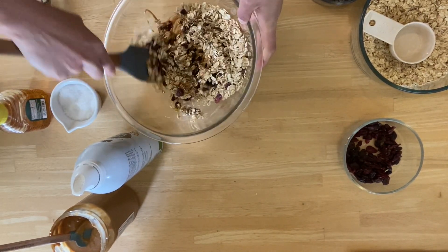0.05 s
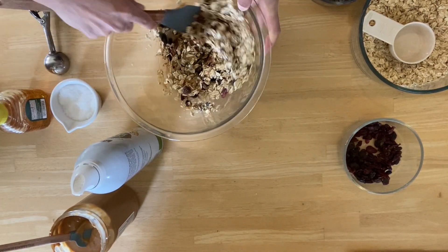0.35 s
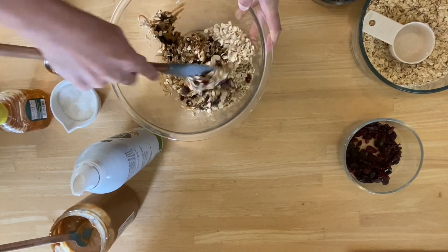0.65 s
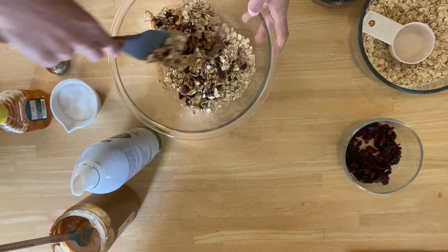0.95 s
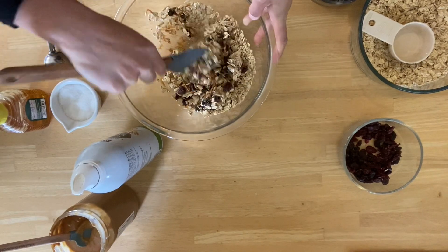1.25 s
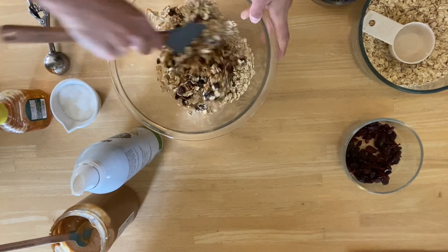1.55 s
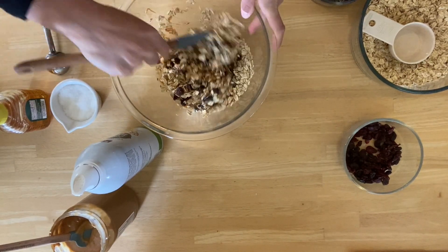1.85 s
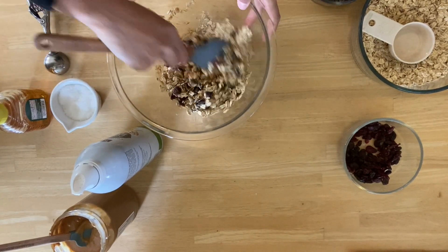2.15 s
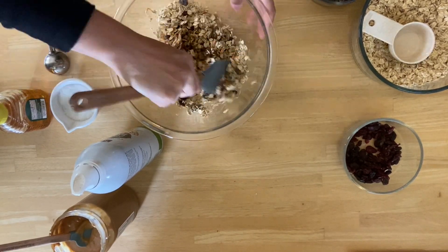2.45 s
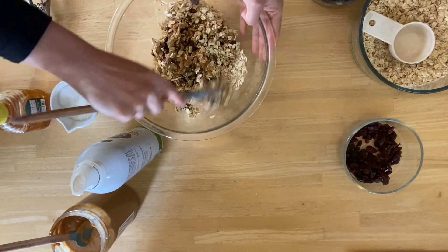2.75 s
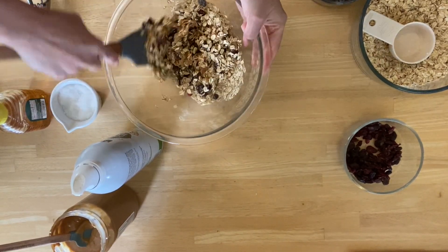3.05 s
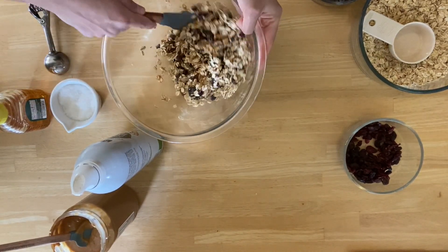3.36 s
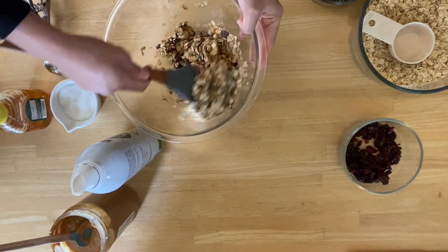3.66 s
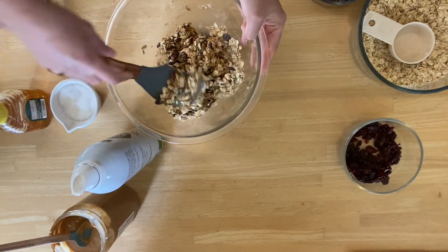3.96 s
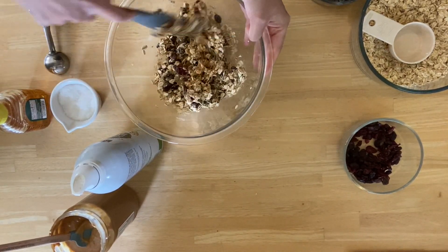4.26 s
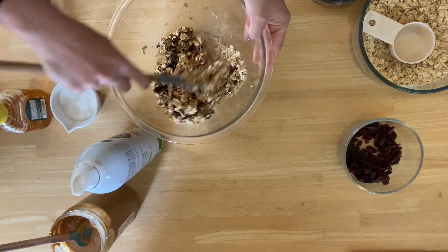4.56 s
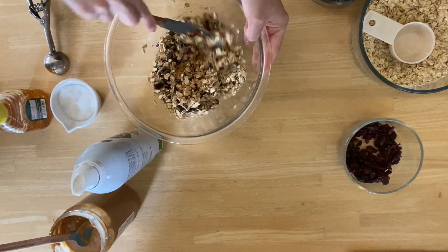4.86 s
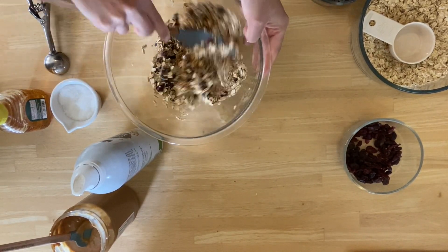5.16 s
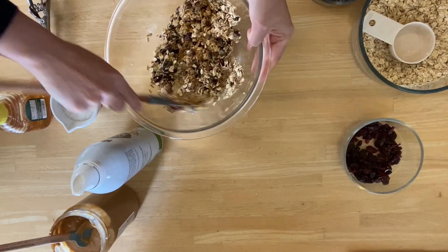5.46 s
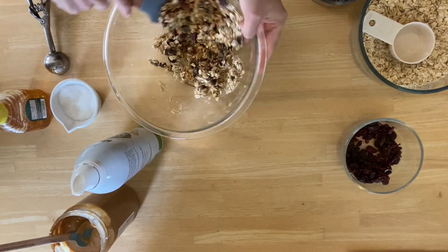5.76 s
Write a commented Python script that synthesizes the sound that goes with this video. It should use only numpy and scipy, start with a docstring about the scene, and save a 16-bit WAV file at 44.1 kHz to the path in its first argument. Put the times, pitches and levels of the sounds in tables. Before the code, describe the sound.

A silicone spatula folds a stiff oat mixture in a glass bowl, about three strokes a second, each a soft crackly rustle and scrape over a low rumble. Around one second in, the bowl rocks and knocks loudly on the wooden worktop, with lighter knocks later. Nuts snap here and there, one sharply near the middle, and the glass clinks faintly. The sound is close, in a small quiet kitchen, in wide stereo leaning right.

```python
"""Folding sticky oats in a glass bowl.

A silicone spatula pushes through a stiff oat mixture: each push rustles the flakes, rumbles the bowl
and may rub the glass. Now and then nuts snap, the glass clinks, and the bowl rocks and knocks on the
wooden worktop. A small kitchen answers. The stereo image is wide and leans to the right."""
import sys
import numpy as np
from scipy import signal
from scipy.fft import rfft, irfft, next_fast_len
from scipy.io import wavfile
from scipy.ndimage import uniform_filter1d, minimum_filter1d

SR = 44100
rng = np.random.default_rng(int(sys.argv[2]) if len(sys.argv) > 2 else 0)


def to_wav(s):
    """Save 16-bit WAV."""
    ch = np.atleast_2d(s).T  # columns
    pcm = np.round(np.clip(ch, -1, 1) * 32767)  # PCM
    wavfile.write(sys.argv[1], SR, pcm.astype(np.int16))


N = 265041


def amp(db):
    """Decibels to gain."""
    return 10 ** (np.asarray(db) / 20)


def unit(x):
    """Scales to rms 1."""
    return x / np.sqrt(np.mean(x ** 2) + 1e-20)


def curve_at(points, hz):
    """Reads a curve along a log-frequency axis."""
    f, value = np.transpose(points)
    return np.interp(np.log(hz + 1), np.log(f + 1), value)


def add(mix, start_s, sound):
    """Drops a sound into the mix."""
    part = mix[max(round(start_s * SR), 0):][:len(sound)]
    part += sound[:len(part)]


def colour(x, eq, size=8192):
    """Minimum-phase EQ through points of (frequency [Hz], gain [dB])."""
    log_gain = np.log(amp(curve_at(eq, abs(np.fft.fftfreq(size, 1 / SR)))))
    taps = np.fft.ifft(np.exp(np.conj(signal.hilbert(log_gain)))).real
    return signal.oaconvolve(x, taps[:size // 2])[:len(x)]


def resonate(x, hz, width_hz):
    """A resonance of gain 1 that follows the pitch curve hz."""
    turn = np.exp(2j * np.pi * np.cumsum(hz) / SR)
    pole = np.exp(-np.pi * width_hz / SR)
    return 2 * (turn * signal.lfilter([1 - pole], [1, -pole], x / turn)).real


def wander(rate_hz):
    """Smooth random modulation of rms 1."""
    lowpass = np.exp(-(np.fft.rfftfreq(N, 1 / SR) / rate_hz) ** 2)
    return unit(irfft(rfft(rng.standard_normal(N)) * lowpass, N))


def grains(per_s, spread_db):
    """Tiny slips at random moments, most small and a few large."""
    size = amp(spread_db * np.minimum(rng.exponential(1, N), 5))
    return unit(size * rng.choice([-1, 1], N) * (rng.random(N) < per_s / SR))


# The kitchen's reverb time: (frequency [Hz], t60 [s])
KITCHEN_DECAY = [(100, 0.18), (300, 0.54), (700, 0.4), (2000, 0.3), (6000, 0.13), (14000, 0.096)]
def room(x, gap_s=0.002):
    """The kitchen's diffuse tail, each band dying at its own speed."""
    taps = rng.choice([-1., 1.], SR) * (np.arange(SR) > gap_s * SR)
    hz, t, bands = signal.stft(taps, SR, nperseg=256)
    decay = amp(-60 * t / curve_at(KITCHEN_DECAY, hz)[:, None])
    tail = signal.istft(bands * decay, SR, nperseg=256)[1]
    return signal.oaconvolve(x, tail / np.linalg.norm(tail))[:len(x)]


# Spatula pushes, with a fader for each layer:
# (start [s], rise [s], release [s], fizz [dB], scrape [dB], shove [dB], grind [dB])
PUSHES = [(-0.01, 0.01, 0.74, -62, -61.5, -58.5, -74.5), (0.338, 0.19, 0.06, -65.5, -72.5, -68.5, -91),
          (0.519, 0.05, 0.98, -67.5, -70.5, -104, -104), (0.697, 0.15, 0.15, -58.5, -55.5, -52, -64.5),
          (1.034, 0.018, 0.32, -58.5, -56, -53, -55), (1.392, 0.014, 0.37, -60.5, -58, -52.5, -63),
          (1.704, 0.024, 0.31, -57, -57, -50.5, -62.5), (1.975, 0.036, 0.88, -64.5, -70, -62, -78.5),
          (2.065, 0.14, 0.071, -58.5, -57, -50.5, -59.5), (2.418, 0.14, 0.12, -60.5, -61, -53, -65.5),
          (2.759, 0.2, 0.43, -61.5, -63.5, -57.5, -72.5), (3.001, 0.094, 0.45, -63, -64, -66, -75),
          (3.451, 0.27, 0.26, -63.5, -66.5, -66.5, -77), (3.974, 0.11, 0.48, -64.5, -63, -63, -67.5),
          (4.351, 0.15, 0.12, -62, -63, -55.5, -77), (4.678, 0.15, 0.086, -61, -61, -56, -78),
          (5.022, 0.15, 0.089, -59.5, -58, -54.5, -68), (5.376, 0.019, 0.059, -68.5, -83, -52.5, -71),
          (5.456, 0.084, 0.27, -53.5, -54, -52, -71), (5.75, 0.029, 0.68, -64, -68, -75.5, -84.5)]
def effort(layer, bite_db=-9.5, bite_s=0.018, release_db=-21, lag_s=0, stretch=1):
    """One layer's envelope over all pushes: the blade bites, builds to full effort and lets go."""
    t, power = np.arange(N) / SR, np.zeros(N)
    fader = ["fizz", "scrape", "shove", "grind"].index(layer)
    for start, rise, release, *levels in PUSHES:
        age = t - start - lag_s
        rise_left = np.clip(1 - age / rise, 0, 1)
        letting_go = np.maximum(age - rise, 0) / (release * stretch)
        db = levels[fader] + bite_db * rise_left ** 2 + release_db * letting_go ** 0.94
        power += (np.clip(age / bite_s, 0, 1) * amp(db)) ** 2
    return np.sqrt(power)


# Modes of the hand-damped glass: (pitch [Hz], struck at the rim [dB], struck low down [dB], t60 [s])
GLASS_MODES = [(1405, -1, -22, .17), (2605, 0, -20, .25), (2860, -5, -20, .06), (4048, 1, -16, .27),
               (4510, -16, -2, .07), (5690, -4, -22, .16), (6880, -14, 0, .04), (7490, -5, -16, .14),
               (7850, -15, -1, .1), (8080, -7, -7, .14), (8850, -12, -2, .09), (9385, -7, -14, .13)]
def glass_ring(height, tilt_db=0):
    """The glass after one tap; the height of the tap decides which modes speak."""
    t = np.arange(SR // 3) / SR
    out = np.zeros(len(t))
    for hz, rim_db, wall_db, t60 in GLASS_MODES:
        db = height * rim_db + (1 - height) * wall_db + tilt_db * np.log2(hz / 4000)
        out += amp(db - 60 * t / t60) * np.sin(2 * np.pi * hz * t)
    return out


# Bright fizz of sliding flakes: (frequency [Hz], gain [dB])
FIZZ_EQ = [(1500, -25), (4000, -9), (6000, -4.5), (7800, 2), (9500, 0), (12000, -4), (14000, -11.5),
           (16000, -30.5)]
# Scrape along the glass: (frequency [Hz], gain [dB])
SCRAPE_EQ = [(200, 1.5), (450, -9), (900, -19), (1400, -9.5), (1900, -7), (2700, -1.5), (3500, -7.5),
             (4500, -3.5), (6000, -5), (9000, -29), (16000, -40.5)]
# Dull grind of the packed mixture: (frequency [Hz], gain [dB])
GRIND_EQ = [(100, -12.5), (330, 3.5), (480, 5.5), (700, -1.5), (950, -1.5), (1400, -1), (2200, -11),
            (6000, -43.5)]
def rustle(pocket_hz=2400, settle_fizz_db=-82.5, settle_scrape_db=-85.5):
    """Sticky flakes slide, crack and grind under the blade, and settle faintly between pushes."""
    slips = grains(per_s=9590, spread_db=1.6)
    crackle = amp(-12) * grains(per_s=99, spread_db=3.5)
    fizz = unit(colour(slips + crackle, FIZZ_EQ)) * (effort("fizz") + amp(settle_fizz_db))
    fizz *= amp(3.1 + 2.1 * wander(70))  # the flakes move in clumps
    drag = unit(colour(grains(per_s=7000, spread_db=1.8), SCRAPE_EQ))
    # the hollow between blade and glass keeps changing size
    pocket = unit(resonate(drag, pocket_hz * np.exp(0.28 * wander(27)), width_hz=200))
    scrape = unit(drag + amp(-18) * pocket) * (effort("scrape") + amp(settle_scrape_db))
    scrape *= amp(7 + 2 * wander(31))
    grind = unit(colour(grains(per_s=1500, spread_db=2), GRIND_EQ)) * effort("grind") * amp(8)
    flakes = fizz + scrape + grind
    glass = glass_ring(height=0.45)
    sheen = signal.oaconvolve(flakes, glass / np.linalg.norm(glass))[:N]
    return flakes + amp(-30) * sheen + amp(-12.5) * room(flakes)


# Low thud of the shoved heap: (frequency [Hz], gain [dB])
RUMBLE_EQ = [(20, -15), (45, -5), (65, -2), (100, 5), (130, 1.5), (180, -5), (250, -9), (315, -1),
             (450, -20), (680, -15.5), (900, -36.5), (2000, -33.5)]
def rumble(firmness=1.2):
    """Soft lumps thud through the bowl into the worktop; firm shoves also patter in the bowl's hollow."""
    # the heap starts after the blade and keeps moving longer
    shove = effort("shove", bite_db=-2, lag_s=0.013, stretch=1.3)
    lumps = unit(colour(grains(per_s=1400, spread_db=1.496), RUMBLE_EQ)) * shove * amp(6)
    hollow_eq = [(60, -21.5), (200, -12), (330, 2.5), (480, -10.5), (700, -3), (950, -36.5), (3000, -50)]
    patter = unit(colour(grains(per_s=500, spread_db=3), hollow_eq))
    return lumps + amp(-58) * patter * (shove / amp(-54)) ** firmness


# The kitchen's noise bed: (frequency [Hz], gain [dB])
ROOM_TONE_EQ = [(20, -50.5), (45, 0), (62, 14), (85, -2.5), (106, 15), (125, 9), (160, -7), (240, 4.5),
                (400, -21.5), (1000, -21.5), (4000, -53.5)]
def room_tone():
    """The low drone of the quiet kitchen."""
    return unit(colour(rng.standard_normal(N), ROOM_TONE_EQ))


# Nuts and flakes breaking: (time [s], level [dB], centre [Hz], crumble t60 [s], relative thump [dB])
SNAPS = [(0.0504, -22, 3050, 0.022, -10), (0.0835, -27.5, 6540, 0.0082, -19),
         (0.3704, -24.5, 7500, 0.017, -6.5), (0.4585, -27, 8650, 0.029, -18.5),
         (0.476, -29, 9200, 0.022, -7.5), (0.8853, -11, 2360, 0.016, -19), (1.043, -29.5, 7260, 0.038, -17),
         (1.7097, -34.5, 2700, 0.015, -8.5), (1.7103, -35, 7600, 0.04, -16),
         (1.98, -38.5, 7000, 0.024, -18), (2.366, -34, 9600, 0.0069, -18), (2.422, -30, 9500, 0.023, -25),
         (2.429, -30, 3870, 0.11, -3.5), (2.4348, -20.5, 7850, 0.054, -38), (2.958, -9.5, 2520, 0.011, -25),
         (2.958, -9, 5300, 0.0092, -37), (2.96, -30.5, 4170, 0.26, -28), (3.087, -32, 6240, 0.0053, -11),
         (3.335, -33.5, 5500, 0.0061, -7), (3.895, -39, 6000, 0.0065, -17.5),
         (4.3598, -32.5, 5080, 0.04, -14), (4.547, -32.5, 5200, 0.01, -15.5),
         (4.607, -37.5, 6500, 0.025, -22), (4.728, -29.5, 4800, 0.009, -10), (4.914, -36, 5670, 0.01, -17),
         (4.926, -43, 3800, 0.008, -15), (5.3958, -37.5, 5180, 0.036, -4), (5.4729, -32.5, 6500, 0.04, -11),
         (5.7565, -31, 8670, 0.026, -20.5)]
def snaps(width_octaves=0.29, skirt_db_per_octave=-18, crumble_db=-6, wet_db=-11.5):
    """Each break is a click and a short crumble, with its own brightness, over a dull thump."""
    t, out = np.arange(SR // 3) / SR, np.zeros(N)
    bands = np.geomspace(200, 16000, 14)
    click = 1. * (t == 0)
    for start, db, hz, t60, thump_db in SNAPS:
        octaves = np.log2(bands / hz)
        peak = -10 * np.log10(1 + (octaves / width_octaves) ** 4)
        shelf = thump_db + skirt_db_per_octave * np.maximum(octaves, 0)
        eq = np.c_[bands, np.maximum(peak, shelf)]
        crumble = rng.standard_normal(len(t)) * amp(crumble_db - 60 * t / t60)
        makeup = np.sqrt(SR / 4 / hz)  # lower bands are narrower and pass less energy
        add(out, start, amp(db) * colour(click + crumble, eq, size=1024) * makeup)
    return out + amp(wet_db) * room(out)


# Taps on the glass: (time [s], level [dB], height [0 low wall to 1 rim], brightness [dB/octave])
GLASS_TAPS = [(0.371, -51, 0.041, 3.5), (0.478, -54, 0.18, -1), (1.054, -48, 0.7, 5),
              (1.7094, -50.5, 0.96, -2.5), (1.9797, -61, 0.27, 6), (2.382, -59, 0.89, 0.5),
              (2.425, -57, 0.15, 7), (5.7574, -57, 0.3, 2.5)]
def clinks(wet_db=-10):
    """Something hard meets the bowl and sets off a short, clear ring."""
    out = np.zeros(N)
    for start, db, height, tilt_db in GLASS_TAPS:
        add(out, start, amp(db) * glass_ring(height, tilt_db))
    return out + amp(wet_db) * room(out)


# Four worktop modes, then those of the bowl on its foot and the kitchen: (pitch [Hz], level [dB], t60 [s])
KNOCK_MODES = [(65, -26, 0.61), (112, -21.5, 0.18), (129.3, -13, 0.22), (194, -16.5, 0.081),
               (310.6, 2.5, 0.055), (313.6, -19.5, 0.31), (361.7, -5, 0.16), (386, -18.5, 0.25),
               (432, -15.5, 0.22), (504.7, -11.5, 0.14), (536.3, -18.5, 0.18), (575.7, -15, 0.057),
               (601, -18, 0.18), (606, -12.5, 0.28), (682, 3, 0.035), (747, -20, 0.21), (711, -13.5, 0.045),
               (785, -19, 0.16), (837, -13.5, 0.09), (1004, -23, 0.037)]
# Jolts and landings: (time [s], level [dB], hardness as low-pass corner [Hz], worktop weight [dB])
LANDINGS = [(0.476, -48.5, 1102, -6), (0.8383, -5.5, 785, 5.5), (0.8836, -13.5, 1600, -14),
            (0.8855, -2.5, 1100, -3.5), (0.8944, -16, 410, 0), (0.9378, -17.5, 1255, 12),
            (0.9658, -14, 760, 10.5), (1.0134, -19.5, 405, -8), (1.142, -19, 380, 9),
            (1.1526, -11, 363, -6), (1.1698, -18, 1420, 9), (1.719, -30, 590, 7), (1.7744, -19.5, 600, 8.5),
            (2.139, -12.5, 510, -5.5), (2.568, -29.5, 250, 3), (5.223, -39, 443, 10.5),
            (5.398, -29, 166, 6)]
def knocks(rise_cycles=0.41, lag_cycles=1.356, chatter_db=-2, chatter_decay_s=0.0057):
    """Each landing rings bowl and worktop; the slow, low modes arrive last."""
    t, thuds, rattle = np.arange(SR) / SR, np.zeros(N), np.zeros(N)
    modes = []
    for hz, db, t60 in KNOCK_MODES:
        cycles = np.maximum(hz * t - lag_cycles * max(1 - hz / 630, 0), 0)
        attack = 1 - np.exp(-cycles / rise_cycles)
        modes.append(amp(db - 60 * cycles / hz / t60) * np.sin(2 * np.pi * cycles) * attack)
    worktop, bowl = sum(modes[:4]), sum(modes[4:])
    chatter_eq = [(200, -17), (600, 6.5), (1250, 2.5), (1800, 2.5), (2800, -3.5), (4000, -28), (9000, -41)]
    for start, db, corner_hz, weight_db in LANDINGS:
        soften = signal.butter(2, corner_hz, fs=SR)
        add(thuds, start, amp(db) * signal.lfilter(*soften, bowl + amp(weight_db) * worktop))
        # glass chatters on wood for a moment, differently at each landing
        chatter = colour(rng.standard_normal(SR) * np.exp(-t / chatter_decay_s), chatter_eq)
        add(rattle, start, amp(db + chatter_db) * signal.lfilter(*soften, chatter))
    reverb_send = amp(-14) * thuds + amp(-5) * rattle
    return reflect(thuds) + rattle + room(reverb_send, gap_s=0.0059)


# Early reflections of the knocks: (delay [s], level [dB], low-pass corner [Hz])
REFLECTIONS = [(0.0121, -10.5, 736), (0.0243, -18.5, 2000), (0.0351, -14, 3000), (0.0571, -20.5, 2000)]
def reflect(x):
    """Adds the first bounces off nearby walls and cupboards."""
    out = x.copy()
    for delay_s, db, corner_hz in REFLECTIONS:
        add(out, delay_s, amp(db) * signal.lfilter(*signal.butter(1, corner_hz, fs=SR), x))
    return out


# The blade on bare glass, from faint singing to wide rasp:
# (start [s], length [s], pitch [Hz], width [Hz], level [dB], glide [octaves/s])
BLADE_RUBS = [(1.271, 0.51, 1550, 260, -62.5, -0.19), (3.075, 0.15, 2073, 1190, -57, 0),
              (4.02, 0.53, 1560, 258.6, -66.5, -0.16), (4.487, 0.12, 4490, 130.7, -58, 0),
              (4.69, 0.11, 1930, 868, -51.5, -0.92), (4.956, 0.28, 4505, 170, -70, 0.28)]
def rubs(flutter_db=3, flutter_hz=8.4):
    """Fine slips of silicone on glass, gathered in one resonance that swells, glides and fades."""
    out = np.zeros(N)
    flutter = unit(amp(flutter_db * wander(flutter_hz)))  # the blade catches and slips
    for start, length, hz, width_hz, db, glide in BLADE_RUBS:
        slips = rng.standard_normal(SR)[:int(length * SR)]
        pitch = hz * 2 ** (glide * (np.arange(len(slips)) / SR - length / 2))
        tone = unit(resonate(resonate(slips, pitch, width_hz), pitch, width_hz))
        add(out, start, amp(db) * tone * np.sqrt(np.hanning(len(tone))))
    return out * flutter


# Left channel's level against the right: (frequency [Hz], gain [dB])
LEFT_EQ = [(30, -6), (110, -10), (380, -8), (700, -6.5), (1200, -8), (1650, -22), (2300, -16), (2800, -22),
           (4200, -17), (5500, -9), (7200, -1), (9500, 0), (16000, 0)]
# Left channel's phase against the right, shifting with frequency; near half a turn, as around 10.5 kHz, the two
# channels cancel in their sum: (frequency [Hz], lead [rad])
LEFT_PHASE = [(20, 0), (100, -3.0), (260, -3.3), (1380, -5.0), (1750, -7.7), (2600, -8.7), (3100, -11.8),
              (3900, -12.3), (4600, -10.1), (6000, -8.1), (7000, -6.7), (8300, -6.1), (10100, -3.3),
              (11200, -2.9), (12200, -0.2), (14000, .3), (14600, 2.9)]
def widen(x):
    """Mono to stereo: the left channel is shifted in phase and, below the treble, weaker."""
    size = next_fast_len(N + SR // 4)
    hz = np.fft.rfftfreq(size, 1 / SR)
    response = amp(curve_at(LEFT_EQ, hz)) * np.exp(1j * curve_at(LEFT_PHASE, hz))
    left = irfft(rfft(x, size) * response, size)[:N]
    return np.array([left, x])


def scene():
    """The bowl and the kitchen in stereo, with a bright tail and a noise bed for each channel."""
    bowl = rustle() + rubs() + rumble() + knocks() + snaps() + clinks()
    treble = colour(bowl, [(300, -5.5), (1500, -9.5), (4000, -5.5), (8000, 2.5), (10500, -13.5)])
    scatter = amp(-18) * np.array([room(treble), room(treble)])
    close = widen(bowl + amp(-61.5) * room_tone())
    wide_bed = amp(-68) * np.array([room_tone(), room_tone()])
    return close + scatter + wide_bed


def record(dry):
    """Master chain: bass cut, a soft limiter on the hardest knock, and a steep top cut."""
    bass_cut_hz, ceiling, top_cut_hz = 38, 0.93, 15750
    dry = signal.sosfilt(signal.butter(4, bass_cut_hz, "highpass", fs=SR, output="sos"), dry)
    peaks = np.maximum(abs(dry).max(0), ceiling)
    held_gain = minimum_filter1d(ceiling / peaks, size=401)
    limited = dry * uniform_filter1d(held_gain, size=401)
    top_cut = signal.firwin(511, top_cut_hz, window=("kaiser", 9), fs=SR)
    return signal.oaconvolve(limited, top_cut[None], "same")


dry = scene()
out = record(dry)
to_wav(out)
```